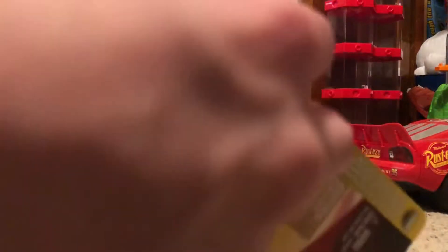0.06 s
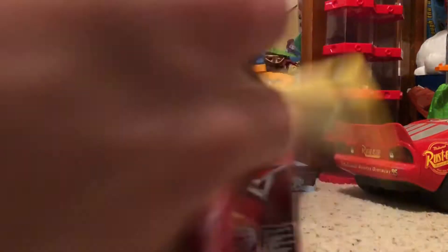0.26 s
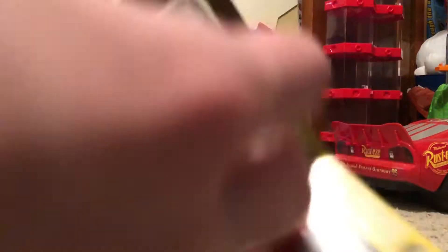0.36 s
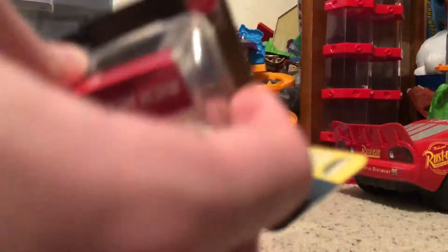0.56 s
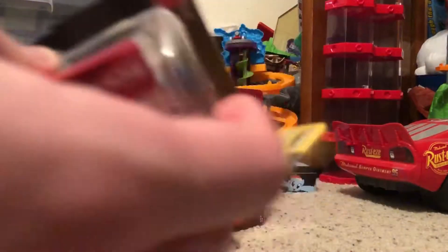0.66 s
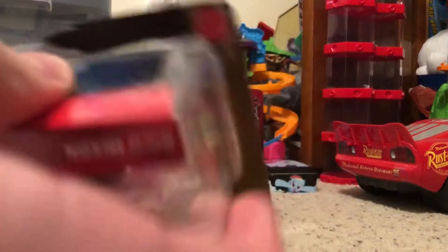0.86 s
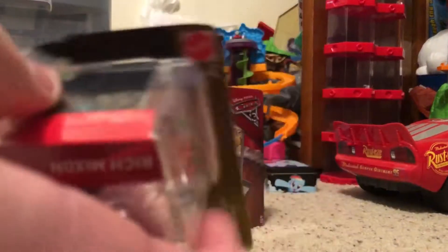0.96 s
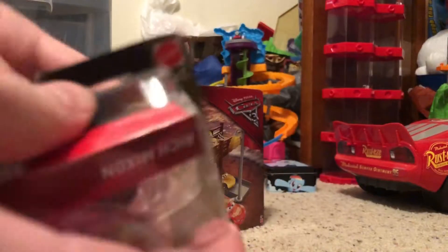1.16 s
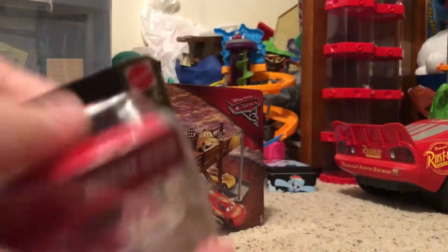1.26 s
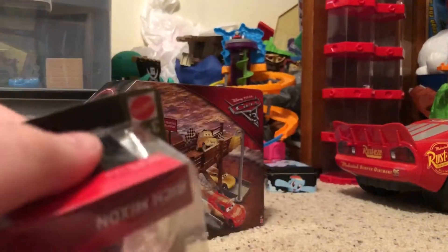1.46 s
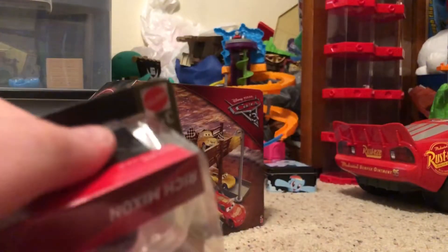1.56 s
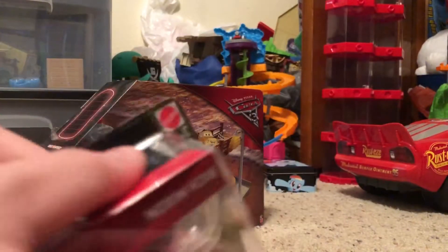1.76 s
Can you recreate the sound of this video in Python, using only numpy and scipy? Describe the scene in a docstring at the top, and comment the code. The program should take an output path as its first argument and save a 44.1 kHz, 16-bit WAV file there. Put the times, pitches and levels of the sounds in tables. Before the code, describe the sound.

A plastic blister pack rips off its cardboard backing, crackling and snapping in the hands.

```python
"""A clear plastic blister is pulled off its cardboard card, close to the microphone in a carpeted room.
First the pack knocks and skin brushes the plastic. At 0.2 s the glued seam rips and the thin shell snaps.
A deep thump follows: each time the grip lets go, the card flexes. From 0.5 s the card slides through
the fingers. From 0.8 s the shell crunches and snaps on, among softer thumps. Last come a short slide
at 1.5 s and a few faint creases."""
import sys
import numpy as np
from scipy import signal
from scipy.fft import rfft, irfft, next_fast_len
from scipy.io import wavfile
from scipy.ndimage import uniform_filter1d

SR = 44100
rng = np.random.default_rng(int(sys.argv[2]) if len(sys.argv) > 2 else 0)


def waveform_to_disk(signal):
    """Save audio, clipped to [-1, 1], as 16-bit WAV at the path in sys.argv[1]."""
    frames = np.transpose(np.atleast_2d(signal))
    scaled = np.clip(frames, -1, 1) * 32767
    samples = np.round(scaled).astype(np.int16)
    wavfile.write(sys.argv[1], SR, samples)


N = 79380  # 1.8 seconds

# The seam ripping. Each row: time in seconds, the shell's rasp in dB, the fibres' fizz in dB.
SEAM_LEVELS = [(.222, -76, -49), (.2305, -39, -28), (.232, -13.5, -22), (.24, -17.5, -21.5),
               (.25, -20.5, -21), (.258, -10.5, -23.5), (.265, -16.5, -21.5), (.278, -22, -23),
               (.288, -24, -25), (.299, -18, -21.5), (.309, -24, -23), (.323, -22, -19.5), (.326, -30, -37),
               (.345, -39, -48)]
# The tone of the low rasp and of the high fizz. Each row: frequency in Hz, level in dB.
RASP_TONE = [(60, -28), (200, -2), (400, 5), (750, -8.5), (1100, 0.5), (1400, 6), (2200, -3.5), (3200, -12),
             (5500, -21), (9000, -51), (16000, -66)]
FIZZ_TONE = [(500, -48), (2000, -18.5), (4000, 0.5), (6000, 1), (8500, 0), (12000, -3), (16000, -5)]
def seam_rip():
    """Glued fibres break in a dense, uneven run and shake the shell."""
    rasp, fizz = fades(SEAM_LEVELS)
    rasp *= slips(per_second=3300, spread_db=5.5, friction=0.43)
    fizz *= slips(per_second=3200, spread_db=1, friction=0.25)
    return colour(rasp, RASP_TONE, shell=True) + colour(fizz, FIZZ_TONE)


# Facets (small flat patches of the shell) buckling. Each row: start in seconds, level in dB,
# pitch in Hz, then the crack and the shell's answer, both in dB relative to that level.
SNAP_EVENTS = [(0.038, -18.5, 1390, -31, -40), (0.232, -13, 1580, -2, -21), (.2419, -13, 890, -10, -16),
               (0.2551, -2, 1300, -14, -13), (.2569, -5.5, 1330, -11, -9), (0.2875, -1, 3140, -7, -25),
               (0.3042, -1.5, 1620, -11.5, -18), (.316, -4, 4800, -17, -23), (0.3703, -4, 3500, -27, -20),
               (0.5295, -25.5, 3470, 9.5, 1), (0.7784, -23, 1670, -3, -7), (0.855, -32.5, 4140, -10, -23),
               (0.8891, -25, 5550, -11, -17), (.932, -38, 5170, -1, -17), (0.9557, -3.5, 2700, -12, -21),
               (0.9645, -23, 1960, -16, -17), (0.9966, -25, 2580, -4, -24), (1.0227, -21, 3280, -18, -21.5),
               (1.0304, -33, 2900, -10, -10), (1.0483, -32, 2850, -28, -14), (1.0696, -26, 2480, -15, -9),
               (1.0748, -35, 4400, -10, -22), (1.1535, -18, 5400, -11, -6.5),
               (1.156, -18, 1510, -25, -12.5), (1.1559, -15, 2700, -19, -30), (1.214, -28, 1400, -18, -20),
               (1.2461, -25, 1630, -20, -20), (1.2734, -26, 1450, -7, -12), (1.3414, -28, 1850, -18, -14),
               (1.42, -21.5, 1790, -30, -16), (1.4213, -27, 2130, -22, -10),
               (1.4784, -31.5, 1300, -28, -11), (1.527, -39, 3500, -3, -22), (1.6945, -22, 5400, -16, -18)]
# The notes of one facet. Each row: multiple of its pitch, level in dB.
FACET_NOTES = [(.68, -9), (1.03, -1), (1.42, -7.5), (2.2, -20.5)]
# The notes of the blister's dome. Each row: frequency in Hz, level in dB, seconds to fade by 60 dB.
DOME_NOTES = [(1796, -30, 0.016), (2090, -13.5, 0.019), (3050, -20.5, 0.027), (3200, -16.5, 0.012),
              (3960, -21.5, 0.012), (4440, -15, .012), (5520, -20, 0.0082), (6570, -18.5, .014)]
# The tone of the crack and of the shell's answer. Each row: frequency in Hz, level in dB.
CRACK_TONE = [(500, -28), (2000, -2.5), (4000, -4.5), (6000, 7.5), (8500, -7), (10500, -3.5), (16000, -13)]
ANSWER_TONE = [(60, -21), (200, -9), (500, -2.5), (850, 0), (1400, 3), (2200, -2), (3500, -21),
               (6000, -16.5), (10000, -25), (16000, -39.5)]
def shell_snaps():
    """A facet flips with a crack and rings briefly; the dome rings too and the whole shell answers."""
    facet_cycles, crack_s, answer_s = 6.5, 0.0047, 0.027  # each fades by 60 dB in this span
    reach_octaves = 1.1  # dome notes this near the snap's pitch ring most
    out, answer, t = np.zeros(N), np.zeros(N), np.arange(SR // 16) / SR
    for start, db, hz, crack_db, answer_db in SNAP_EVENTS:
        crack_noise, answer_noise = rng.standard_normal((2, len(t)))
        facet = sum((-1) ** k * amp(level) * np.sin(2 * np.pi * hz * ratio * t)
                    for k, (ratio, level) in enumerate(FACET_NOTES))
        facet *= amp(-60 * t * hz / facet_cycles) * (1 - np.exp(-t * hz / 0.3))
        dome = np.zeros(len(t))
        for note_hz, level, fade_s in DOME_NOTES:
            nearness = np.exp(-(np.log2(note_hz / hz) / reach_octaves) ** 2)
            note = np.sin(2 * np.pi * (note_hz * t + rng.random()))
            dome += nearness * amp(level - 60 * t / fade_s) * note
        dome *= 1 - np.exp(-t * hz)
        crack = colour(amp(crack_db - 60 * t / crack_s) * crack_noise, CRACK_TONE)
        add(out, start, amp(db) * (1.51 * facet + dome + crack))
        add(answer, start, amp(db + answer_db - 60 * t / answer_s) * answer_noise)
    return out + colour(answer, ANSWER_TONE, shell=True)


# Clusters of tiny creases. Each row: time of the peak in seconds, level in dB,
# seconds to rise by 20 dB, seconds to fall by 20 dB, treble in dB relative to the level.
CRUNCH_EVENTS = [(.001, -28, 0.0027, 0.0047, -21), (.038, -37, 0.017, .014, -15),
                 (0.14, -48.5, .002, 0.013, 3), (.181, -54, 0.0035, 0.011, 6),
                 (.371, -18, 0.00077, 0.0045, 2), (.378, -20, 0.0074, 0.0024, 4),
                 (0.399, -26.5, 0.0036, 0.0064, -21), (0.4109, -17, 0.0075, 0.0084, -9),
                 (0.486, -23.5, 0.0025, 0.0061, -16), (0.528, -21.5, 0.00067, 0.0061, -5),
                 (0.607, -32.5, 0.0017, 0.0013, 9), (0.8, -33.5, 0.0024, 0.018, -12),
                 (.821, -30.5, 0.0032, 0.0093, -10.5), (.889, -33, 0.0098, 0.0084, -9.5),
                 (0.897, -34.5, .005, 0.018, -5.5), (0.963, -38.5, 0.0018, 0.0072, 5.5),
                 (.993, -47, 0.017, 0.012, 7), (1.1546, -21.5, 0.0019, 0.026, -15.5),
                 (1.164, -40, 0.0015, 0.0079, -3), (1.176, -32.5, 0.0012, 0.012, -4),
                 (1.2, -32.5, 0.013, 0.018, -16), (1.229, -37, .002, .005, -5),
                 (1.25, -36, 0.0037, .01, -9.5), (1.293, -34, .005, 0.0066, -9.5),
                 (1.308, -37.5, 0.0037, 0.0046, -21), (1.331, -42.5, .004, 0.013, -10.5),
                 (1.385, -44, 0.011, 0.032, -12.5), (1.419, -38.5, 0.019, 0.022, -13.5),
                 (1.456, -47, .003, 0.0059, -27), (1.667, -57, 0.0027, 0.018, -18),
                 (1.677, -43, .004, 0.0026, -23), (1.695, -44, 0.00093, 0.0044, -10),
                 (1.713, -46, 0.025, 0.02, -8), (1.778, -40, 0.039, 0.031, -18)]
# The tone of a crease. Each row: frequency in Hz, level in dB.
CREASE_TONE = [(60, -43), (200, -6), (500, 1.5), (850, -4), (1400, 3.5), (2200, -5.5), (3500, -12.5),
               (6000, -18.5), (10000, -41), (16000, -33)]
def shell_crunches():
    """The thin plastic creases in clusters that swell and die away."""
    t, body, treble = np.arange(N) / SR, np.zeros(N), np.zeros(N)
    for peak, db, rise, fall, treble_db in CRUNCH_EVENTS:
        swell = amp(db - 20 * np.maximum((peak - t) / rise, (t - peak) / fall))
        body += swell
        treble += swell * amp(treble_db)
    body *= slips(per_second=1800, spread_db=2, friction=0.27)
    treble *= slips(per_second=2400, spread_db=2, friction=0.24)
    return colour(body, CREASE_TONE, shell=True) + colour(treble, FIZZ_TONE)


# The card flexing. Each row: start in seconds, level in dB, middle pitch in Hz, seconds to fade by 60 dB.
THUMP_EVENTS = [(0, -14, 450, 0.0083), (0.038, -25, 524, 0.036), (.044, -29.5, 180, 0.074),
                (0.1777, -30.5, 1150, 0.011), (.179, -22.5, 556, 0.016), (0.233, -15.5, 367, 0.06),
                (0.24, -26.5, 180, 0.12), (.264, -26, 422, 0.065), (.318, -19, 255, 0.038),
                (0.27, -25.5, 106, 0.11), (0.321, -25, 110, 0.064), (.3665, -7, 181, 0.047),
                (0.377, -7.5, 77, 0.077), (0.378, -14, 52.3, 0.08), (.385, -23, 240, 0.047),
                (0.442, -32.5, 76.4, 0.28), (0.5303, -12, 206, 0.03), (0.5452, -14, 270, 0.027),
                (0.539, -20.5, 91.5, 0.063), (.54, -24, 552, 0.047), (0.741, -13, 308, 0.029),
                (0.745, -30, 143, .07), (0.78, -17.5, 375, 0.023), (0.799, -39, 122, 0.087),
                (.9583, -25.5, 628, 0.049), (0.96, -26, 194, 0.017), (.98, -44, 92, 0.69),
                (1.033, -37.5, 375, 0.07), (1.035, -45, 163, 0.13), (1.073, -32.5, 313, 0.046),
                (1.16, -27.5, 490, 0.056), (1.161, -19.5, 147, 0.05), (1.16, -36, 74, 0.088),
                (1.211, -48, 99.4, 0.32), (1.254, -41, 478, 0.11), (1.48, -35.5, 456, 0.015),
                (1.486, -45, 104, 0.085), (1.586, -36.5, 438, 0.051), (1.695, -35.5, 440, 0.026),
                (1.78, -52, 475, 0.032)]
def card_thumps():
    """The card springs back, damped by the hand; its pitch sags as it relaxes."""
    rise_cycles, sag, roughness = 0.45, 0.12, 0.8
    out, t = np.zeros(N), np.arange(SR // 3) / SR
    for start, db, hz, fade_s in THUMP_EVENTS:
        pitch = hz * (1 + sag * (2 * np.exp(-t * hz / 2) - 1))
        note = 1.344 * np.sin(2 * np.pi * np.cumsum(pitch) / SR)
        flutter_tone = [(hz / 4, -15), (hz, 0), (hz * 1.73, -7), (hz * 3, -32), (hz * 8, -60)]
        flutter = unit(colour(rng.standard_normal(len(t)), flutter_tone))
        loudness = amp(db - 60 * t / fade_s) * (1 - np.exp(-t * hz / rise_cycles))
        add(out, start, loudness * (note + roughness * flutter))
    return out


# Two strokes of the card through the fingers. Each row: time in seconds, rub in dB, hiss in dB.
LONG_STROKE = [(.494, -56, -53), (.503, -39, -43), (.521, -37.5, -36.5), (.545, -26.5, -53),
               (.556, -39.5, -48), (.585, -40.5, -38), (.61, -35.5, -39.5), (.635, -51, -50.5),
               (.66, -42, -35.5), (.68, -48.5, -41.5), (.718, -40, -41.5), (.732, -34.5, -25.5),
               (.741, -23.5, -18.5), (.747, -35.5, -38.5), (.765, -37, -40), (.779, -33.5, -39.5),
               (.789, -48, -46)]
SHORT_STROKE = [(1.526, -58, -62), (1.5275, -42.5, -53), (1.543, -45.5, -54), (1.56, -43.5, -42),
                (1.583, -39.5, -42), (1.588, -43, -54), (1.605, -58, -72)]
# The tone of the rub and of the hiss. Each row: frequency in Hz, level in dB.
RUB_TONE = [(60, -26), (200, -3.5), (450, -1), (850, -1.5), (1600, 4.5), (2500, -2), (4000, -7),
            (7000, -22), (16000, -22)]
HISS_TONE = [(500, -30), (2000, -19), (3600, 2), (5200, -1.5), (7000, -2), (8500, -1), (10000, -3.5),
             (12500, -4), (16000, -9.5)]
def card_slides():
    """The card sticks and slips in tiny steps against skin and plastic."""
    rub, hiss = np.add(fades(LONG_STROKE), fades(SHORT_STROKE))
    rub *= slips(per_second=3400, spread_db=5, friction=0.62)
    hiss *= slips(per_second=3500, spread_db=5, friction=0.64)
    return colour(rub, RUB_TONE, shell=True) + colour(hiss, HISS_TONE)


# The pack shifting in the hands, and skin brushing it. Each row: time in seconds, level in dB.
GRIP_LEVELS = [(0, -36), (.05, -47.5), (.09, -61), (.17, -62.5), (.22, -50.5), (.33, -51), (.36, -33),
               (.43, -42.5), (.46, -47.5), (.81, -46), (.85, -53.5), (.945, -57.5), (.97, -44.5),
               (1.05, -52), (1.145, -51.5), (1.185, -49), (1.24, -46.5), (1.32, -49), (1.37, -57),
               (1.44, -58.5), (1.51, -59.5), (1.6, -67), (1.655, -80), (1.68, -55.5), (1.74, -59.5),
               (1.8, -54)]
BRUSH_LEVELS = [(0, -61), (.03, -64), (.07, -46.5), (.095, -61), (.12, -59), (.15, -63), (.17, -55),
                (.2, -51), (.225, -52)]
# The tone of the shifting grip. Each row: frequency in Hz, level in dB.
GRIP_TONE = [(40, -6), (90, 3.5), (200, -0.5), (500, -0.5), (850, -4), (1400, 0), (2200, -11),
             (3500, -13.5), (7000, -16.5), (16000, -36)]
def handling():
    """The shifting grip ticks and rustles faintly; skin brushes the plastic before the pull."""
    grip = fades(GRIP_LEVELS)[0] * slips(per_second=450, spread_db=1.5, friction=0.65)
    brush = fades(BRUSH_LEVELS)[0] * slips(per_second=900, spread_db=5, friction=0.6)
    return colour(grip, GRIP_TONE, shell=True) + colour(brush, FIZZ_TONE)


# The room's echo. Each row: frequency in Hz, seconds to fade by 60 dB.
ECHO_FADES = [(100, 0.16), (1500, 0.19), (5000, 0.16), (15000, 0.097)]
def room_echo(sound):
    """The carpeted room adds a short, soft tail 4 ms later; the treble dies first."""
    hz, t, bands = signal.stft(rng.standard_normal(SR // 2), SR, nperseg=256)
    bands *= amp(-60 * t / along(ECHO_FADES, hz)[:, None])
    tail = signal.istft(bands, SR, nperseg=256)[1]
    delayed = np.pad(tail / np.linalg.norm(tail), (SR // 250, 0))
    return signal.fftconvolve(sound, delayed)[:N]


# The tone of the background. Each row: frequency in Hz, level in dB.
AIR_TONE = [(25, -32), (80, 4), (200, -6.5), (600, -11), (2000, -31), (16000, -28)]
def room_air():
    """A steady, low hush fills the room."""
    return colour(rng.standard_normal(N), AIR_TONE)


# The notes at which the shell rings. Each row: frequency in Hz, width in Hz, relative strength in dB.
SHELL_NOTES = [(370, 42, 1), (660, 240, -10), (1269, 74, 1), (1330, 44, -1), (1470, 79, -2.5),
               (1637, 40, 0.5), (1870, 250, -3.5), (2330, 250, 2.5), (3310, 185, 6)]
def colour(sound, tone, shell=False, size=8192):
    """Give a sound a tone, and the shell's ring if asked; white noise keeps its power."""
    freqs = np.fft.rfftfreq(size, 1 / SR)
    gain = amp(along(tone, freqs))
    if shell:
        peaks = sum(amp(db - 0.5) ** 2 / (1 + (2 * (freqs - hz) / width) ** 2)
                    for hz, width, db in SHELL_NOTES)
        gain *= np.sqrt(1 + peaks)
    # Make the filter ring only after each tick, never before it (minimum phase).
    cepstrum = irfft(np.log(gain))
    cepstrum[1:size // 2] *= 2
    cepstrum[size // 2 + 1:] = 0
    response = irfft(np.exp(rfft(cepstrum)))[:size // 2]
    return signal.fftconvolve(sound, response / np.linalg.norm(response))[:len(sound)]


def slips(per_second, spread_db, friction, tone_spread_db=3.5):
    """Tiny slips of uneven size and tone tick over smooth friction noise, at a steady level."""
    sizes = amp(spread_db * np.clip(rng.standard_normal(N), -2, 2)) * rng.choice([-1, 1], N)
    ticks = unit(sizes * (rng.random(N) < per_second / SR))
    bands = signal.stft(ticks + friction * rng.standard_normal(N), nperseg=128)[2]
    patches = uniform_filter1d(rng.standard_normal(bands.shape), size=3, axis=0)  # blur over pitch
    patches = uniform_filter1d(patches, size=5, axis=1)  # and over time
    bands *= amp(tone_spread_db * np.clip(unit(patches), -2, 2))
    crackle = signal.istft(bands, nperseg=128)[1][:N]
    power = np.abs(uniform_filter1d(crackle ** 2, size=400))
    return crackle / np.sqrt(power + 1e-6)


def fades(rows):
    """Turn each dB column into a volume curve, silent outside the table's times."""
    times, *columns = np.transpose(rows)
    return [amp(np.interp(np.arange(N) / SR, times, db, left=-120, right=-120)) for db in columns]


def along(points, hz):
    """Read between (Hz, value) points, with octaves evenly spaced."""
    freqs, values = np.transpose(points)
    return np.interp(np.log(hz + 1), np.log(freqs + 1), values)


def add(track, start, sound):
    """Mix a sound in at a start time in seconds."""
    i = max(round(start * SR), 0)
    track[i:i + len(sound)] += sound[:max(N - i, 0)]


def amp(db):
    """Turn dB into a multiplier."""
    return 10 ** (np.asarray(db) / 20)


def unit(x):
    """Scale to an average power of one."""
    return x / np.sqrt(np.mean(x ** 2) + 1e-20)


def scene():
    """Mix the pack, its echo and the room's hush into one channel."""
    echo_db, air_db = -19.5, -61
    pack = seam_rip() + card_slides() + shell_crunches() + shell_snaps() + card_thumps() + handling()
    return (pack + amp(echo_db) * room_echo(pack) + amp(air_db) * room_air())[None]


def record(dry):
    """The recorder cuts the deepest bass, rounds off the highest peaks and drops the very top treble."""
    low_cut_hz, top_hz = 32, 16100
    x = signal.sosfilt(signal.butter(N=2, Wn=low_cut_hz, btype="high", fs=SR, output="sos"), dry)
    rounded = x / (1 + np.abs(x) ** 8) ** (1 / 8)
    size = next_fast_len(N + SR // 4)
    treble_cut = 1 + (np.fft.rfftfreq(size, 1 / SR) / top_hz) ** 160
    return irfft(rfft(rounded, size) / treble_cut, size)[..., :N]


dry = scene()
out = record(dry)
waveform_to_disk(out)
```